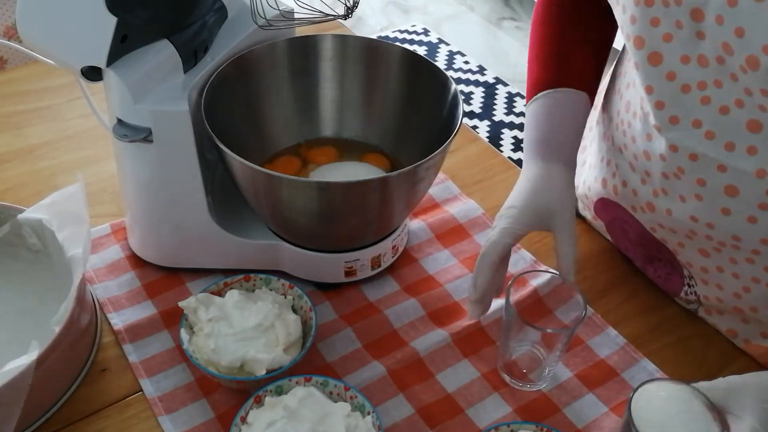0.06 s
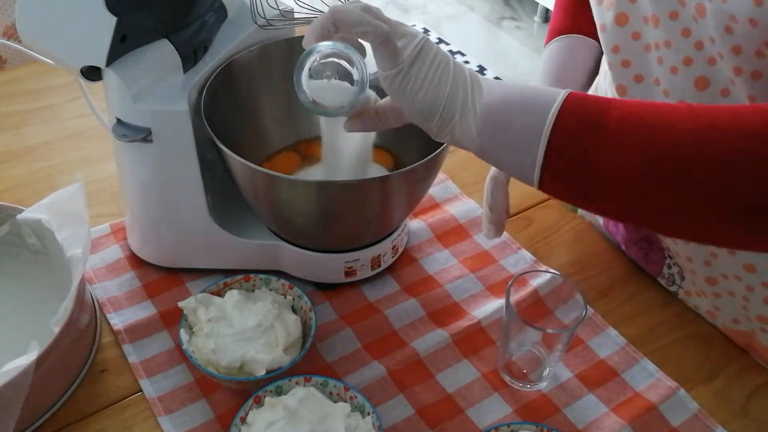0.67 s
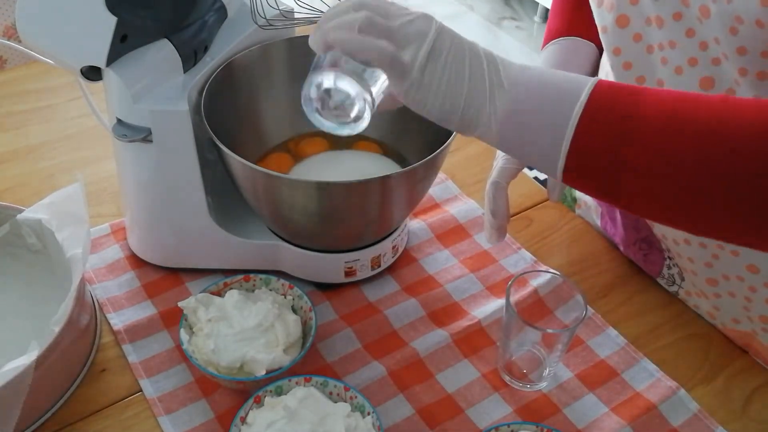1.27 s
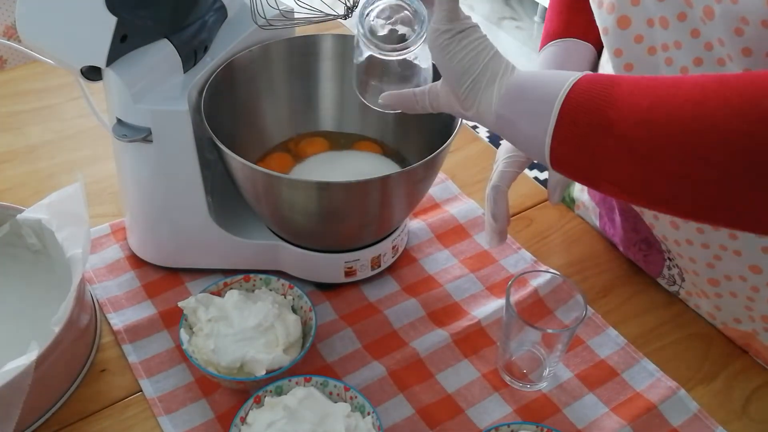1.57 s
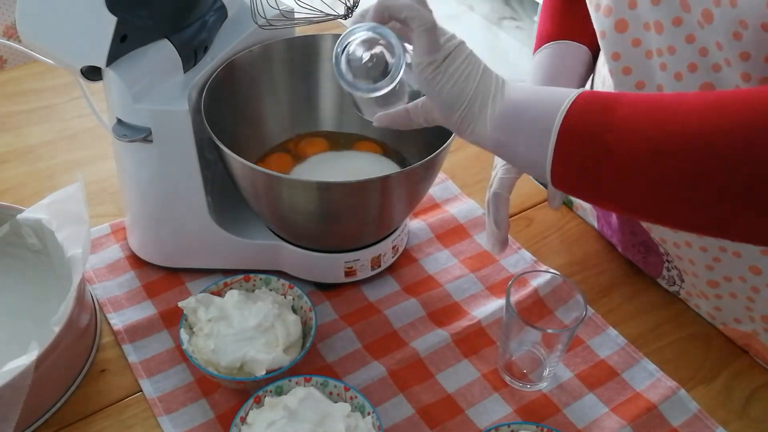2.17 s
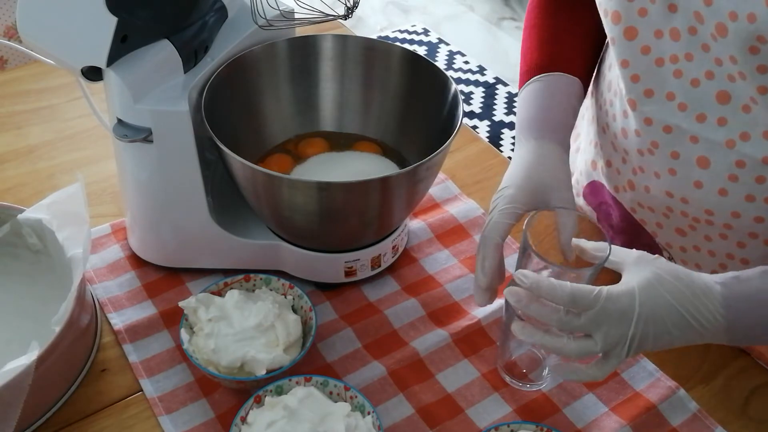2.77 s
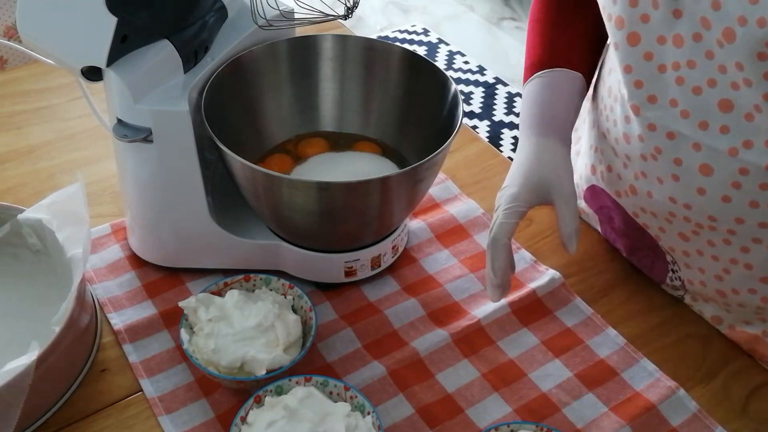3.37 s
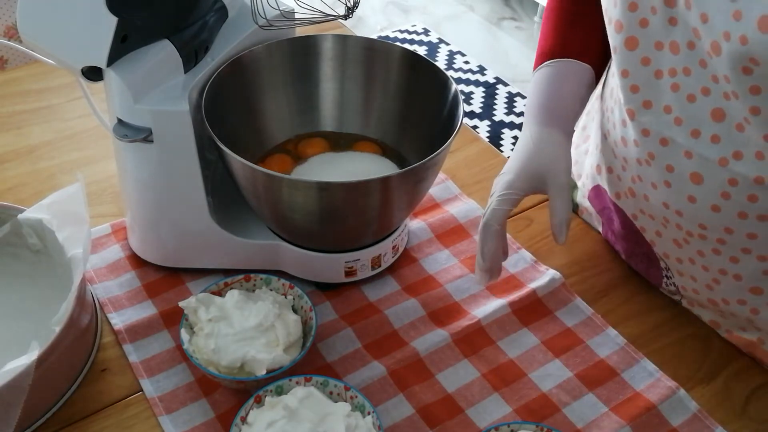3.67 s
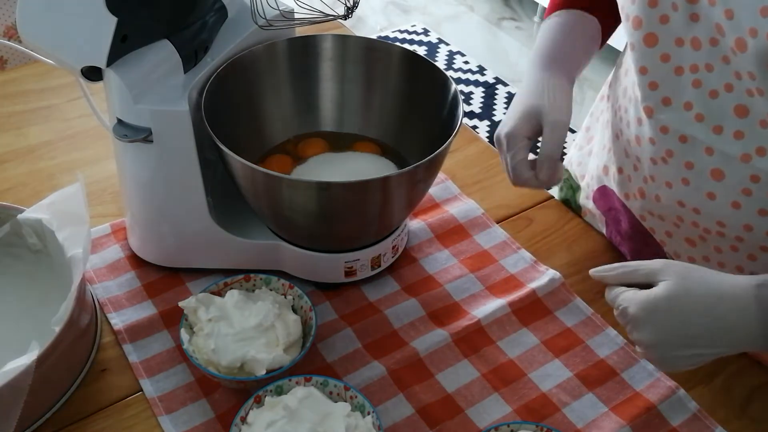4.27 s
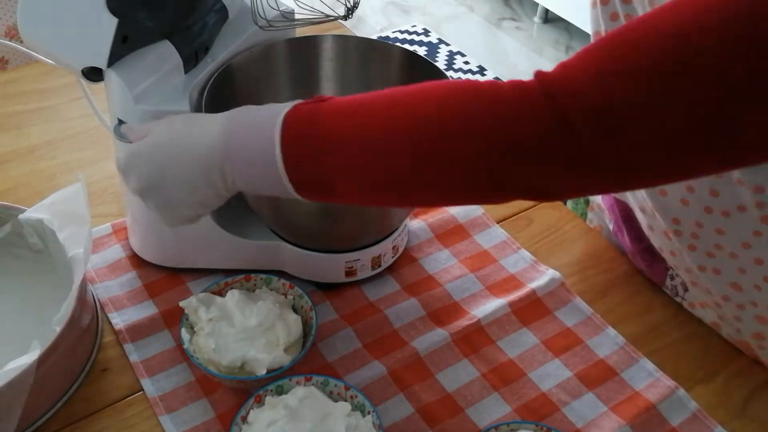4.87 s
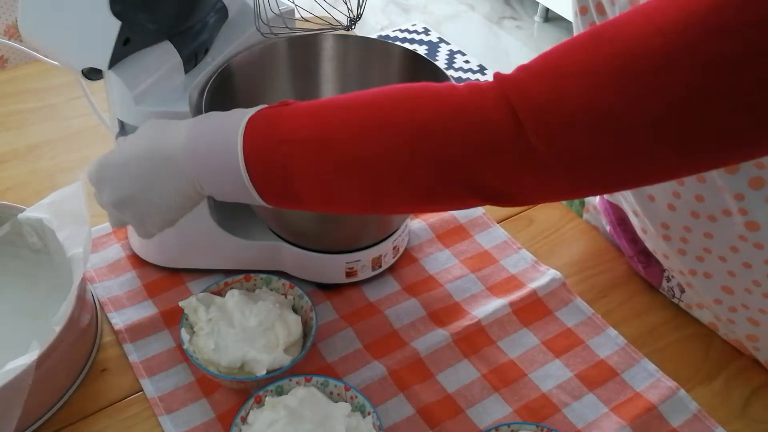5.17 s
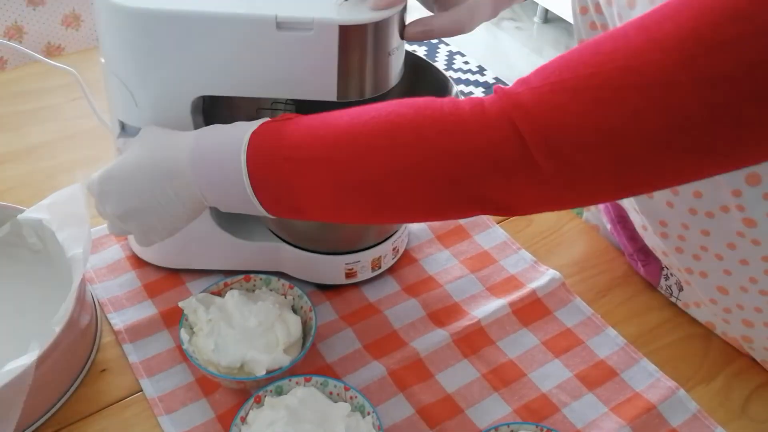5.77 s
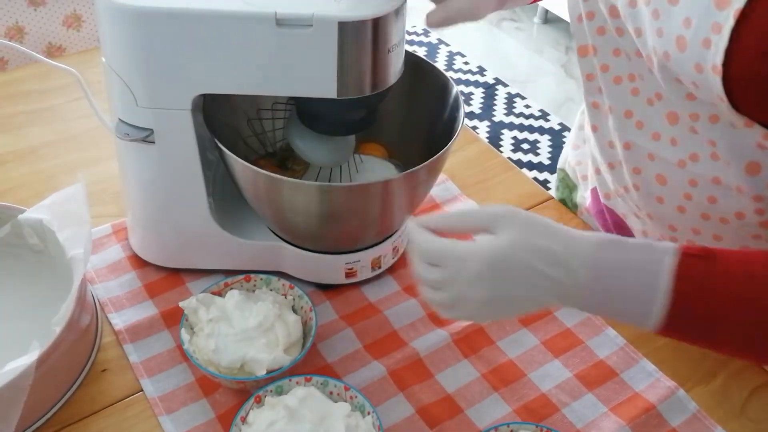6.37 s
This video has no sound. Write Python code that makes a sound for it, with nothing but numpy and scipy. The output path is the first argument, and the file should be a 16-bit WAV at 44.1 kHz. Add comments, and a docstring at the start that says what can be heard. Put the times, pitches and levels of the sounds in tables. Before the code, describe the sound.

A soft, brief pour of sugar into a metal bowl is followed by a quick cluster of clinks as two glasses are stacked, then sharp knocks as they land on a wooden table. After some quiet rustling, a stand mixer's latch clicks and jolts, and the head thuds down, rebounds and locks. A low oven fan hum runs underneath, all heard from nearby with a short kitchen echo.

```python
"""A stand mixer's latch rattles free; its head swings down, thuds home, rebounds and locks.
Before that, sugar hisses into a steel bowl, the empty glass clinks into another one and the pair
is set down hard on a wooden kitchen table. An oven fan hums throughout; gloves and a sleeve rustle.
Blows are decaying sine modes plus dying noise; pouring and rubbing are noise that swells and fades."""
import sys
import numpy as np
from scipy import signal
from scipy.fft import rfft, irfft, next_fast_len
from scipy.io import wavfile

SR = 44100
rng = np.random.default_rng(int(sys.argv[2]) if len(sys.argv) > 2 else 0)


def wav_record(signal):
    """Record a signal, one row per channel, as 16-bit PCM in the file named by sys.argv[1]."""
    frames = np.transpose(np.atleast_2d(signal))
    bounded = np.clip(frames, -1, 1)
    # unit amplitude maps onto the largest positive 16-bit level
    quanta = np.round(bounded * 32767).astype(np.int16)
    wavfile.write(sys.argv[1], SR, quanta)


N = 292177
RING_TIME_S = np.arange(int(.6 * SR)) / SR
BLOW_SAMPLES = .03 * SR


def from_db(db):
    """Decibels to gain."""
    return 10 ** (np.asarray(db) / 20)


def rms_one(x):
    """Scale to rms 1."""
    return x / np.sqrt(np.mean(x ** 2) + 1e-20)


def unit_blow(x):
    """Scale to the energy of 30 ms at rms 1."""
    return rms_one(x) * np.sqrt(BLOW_SAMPLES / x.shape[-1])


def at_hz(points, hz):
    """Read a table on a log-frequency axis."""
    f, value = np.transpose(points)
    return np.interp(np.log(np.maximum(hz, 1)), np.log(f), value)


def drift(rate_hz):
    """Smooth random curve, rms 1."""
    knots = np.arange(N) / SR * rate_hz
    return rms_one(np.interp(knots, np.arange(4096), rng.standard_normal(4096)))


def add(track, s, sound):
    """Mix a sound in at s seconds."""
    start = max(round(s * SR), 0)
    track[:, start:start + sound.shape[-1]] += sound[:, :N - start]


def strokes(rows, rise_db_per_s, fall_db_per_s):
    """Gain of movements that swell, hold and fade."""
    t = np.arange(N) / SR
    levels_db = [db - rise_db_per_s * np.maximum(s - t, 0) - fall_db_per_s * np.maximum(t - s - hold_s, 0)
                 for s, hold_s, db in rows]
    return from_db(np.max(levels_db, axis=0))


# microphone pair: f/Hz, left-right correlation
CORRELATION = [(60, 0.8), (250, 0.9), (600, 0.9), (1200, 0.35), (2500, 0.018), (12000, 0)]

def stereo_pair(mid, side, hz):
    """Left and right: alike in the bass, unrelated in the treble."""
    alike = at_hz(CORRELATION, hz)
    return np.sqrt(1 + alike) * mid + np.sqrt(1 - alike) * side * [[1], [-1]]


def stereo_noise(spectrum, size):
    """Steady coloured noise, rms 1."""
    hz = np.fft.rfftfreq(size, 1 / SR)
    mid, side = np.exp(2j * np.pi * rng.random((2, len(hz))))
    return rms_one(irfft(stereo_pair(mid, side, hz) * from_db(at_hz(spectrum, hz)), size))


def dying_noise(spectrum, t60s):
    """Crowd of short-lived modes: half-octave noise bands decaying by t60s (f/Hz, t60/s)."""
    out, edges_hz = 0, 31.25 * 2 ** np.arange(0, 9.3, .5)
    for low, high in zip(edges_hz, edges_hz[1:]):
        hz = np.sqrt(low * high)
        decay = from_db(-60 * RING_TIME_S / at_hz(t60s, hz))
        burst = rng.standard_normal((2, len(decay))) * decay
        band = signal.butter(2, [low, high], "band", fs=SR, output="sos")
        mid, side = map(rms_one, signal.sosfilt(band, burst))
        out += stereo_pair(mid, side, hz) * from_db(at_hz(spectrum, hz)) * np.sqrt(high - low)
    return unit_blow(out)


def ring(modes, detune=0, scatter_db=.8):
    """Sines swell for one cycle and decay; each blow and microphone catches them differently."""
    out = 0
    for k, (hz, db, t60_s) in enumerate(modes):
        mic_phase = np.pi * rng.normal(0, .56, (2, 1)) * (1 - at_hz(CORRELATION, hz))
        phase = 2 * np.pi * hz * (1 + detune * rng.normal()) * RING_TIME_S + mic_phase
        attack = np.minimum(hz * RING_TIME_S, 1)
        decay = from_db(db + scatter_db * rng.normal() - 60 * RING_TIME_S / t60_s)
        out += (-1) ** k * attack * decay * np.sin(phase)
    return unit_blow(out)


def soften(blow, contact_hz):
    """A softer contact lasts longer and leaves the high modes quiet."""
    return unit_blow(signal.sosfilt(signal.butter(2, contact_hz, fs=SR, output="sos"), blow))


# room decay: f/Hz, t60/s
KITCHEN_DECAY = [(100, .22), (500, .24), (2000, .27), (6000, .23), (15000, .19)]

def in_kitchen(x, wet_db, delay_s):
    """Direct sound plus the diffuse tail from the walls."""
    tail = dying_noise([(30, 0), (16000, 0)], KITCHEN_DECAY) / np.sqrt(BLOW_SAMPLES)
    out = x.copy()
    add(out, delay_s, from_db(wet_db) * signal.fftconvolve(x, tail, axes=1))
    return out


# fan and motor lines: f/Hz, level/dB
HUM_LINES = [(204.7, -54), (371.4, -68), (409.3, -61.5), (821, -64), (1179, -65)]
# air noise: f/Hz, density/dB
AIR_SPECTRUM = [(25, 0), (55, -4), (90, 0.5), (150, -4.5), (350, 0), (480, -9), (850, -6), (1400, -10.5),
                (2000, -9), (2900, -21.5), (5500, -25.5), (9000, -30), (16000, -32.5)]

def oven_fan(air_db=-50.5, waver_db=1.5, wander_hz=.89, right_lag_samples=7):
    """Air noise and wavering hum lines, reaching the left microphone first; higher lines wander more."""
    out = from_db(air_db) * stereo_noise(AIR_SPECTRUM, N)
    for hz, db in HUM_LINES:
        pitch_hz = hz + wander_hz * hz / HUM_LINES[0][0] * drift(12)
        gain = np.sqrt(2) * from_db(db + waver_db * drift(8.6))
        out += gain * np.sin(2 * np.pi * np.cumsum(pitch_hz) / SR)
    return np.array([out[0], np.roll(out[1], right_lag_samples)])


# surges, then the last grains shaken loose: t/s, hold/s, level/dB
POURS = [(.63, 0.063, -57), (.69, 0.082, -59), (.845, 0.029, -56.5), (1.703, .003, -70),
         (1.815, 0.014, -67)]
# grains, also glove ticks: f/Hz, density/dB
GRAIN_SPECTRUM = [(500, -1), (5500, -1), (10700, 1), (15500, 2)]
# steel bowl: f/Hz, level/dB, t60/s
BOWL_MODES = [(5480, -10, .03), (9450, -5, .025), (11800, 2, .008), (13200, 2, .007)]

def sugar(grains_per_s=1500, size_spread_db=3, patter_db=-2, bowl_db=-5):
    """Grains hiss out of the glass and patter on the steel, which rings faintly."""
    sizes = from_db(size_spread_db * np.minimum(rng.exponential(1, N), 5))
    grains = sizes * rng.choice([-1, 1], (2, N)) * (rng.random(N) < grains_per_s / SR)
    bowl = rms_one(signal.fftconvolve(grains, ring(BOWL_MODES), axes=1)[:, :N])
    tick = dying_noise(GRAIN_SPECTRUM, [(1000, .0054)])
    patter = rms_one(signal.fftconvolve(grains, tick, axes=1)[:, :N])
    hiss = stereo_noise(GRAIN_SPECTRUM, N)
    stream = rms_one(hiss + from_db(patter_db) * patter + from_db(bowl_db) * bowl)
    return strokes(POURS, rise_db_per_s=220, fall_db_per_s=150) * stream


# sleeve, latch and hinge rubbing: t/s, hold/s, level/dB
RUBS = [(4.06, 0.12, -59), (4.6, 0.41, -60), (5.08, 0.035, -44), (5.48, 0.16, -48.5), (5.81, 0.026, -45),
        (5.97, 0.0075, -42.5), (6.28, 0.21, -58.5)]
# mixer casing, rubbed or struck: f/Hz, density/dB
CASING_SPECTRUM = [(150, -13.5), (350, -11), (600, -0.5), (1000, 2), (1800, 0), (3000, -4.5), (5000, -7),
                   (7000, -13.5), (10000, -14), (15000, -19.5)]
# gloves on glass and casing: t/s, level/dB
GLOVE_TICKS = [(2.514, -67), (4.058, -65), (4.092, -65), (5.647, -57)]

def handling(friction_db=1.5, hollow_hz=730, width_hz=140, hollow_db=-6):
    """Uneven rubbing sets the hollow casing singing; gloves tick."""
    friction = rms_one(from_db(friction_db * drift(150)))
    hiss = stereo_noise(CASING_SPECTRUM, N) * friction
    hollow = rms_one(signal.lfilter(*signal.iirpeak(hollow_hz, hollow_hz / width_hz, fs=SR), hiss))
    rubs = strokes(RUBS, rise_db_per_s=182, fall_db_per_s=172) * (hiss + from_db(hollow_db) * hollow)
    ticks = np.zeros((2, N))
    for s, db in GLOVE_TICKS:
        add(ticks, s, from_db(db) * dying_noise(GRAIN_SPECTRUM, [(1000, .018)]))
    return rubs + in_kitchen(ticks, wet_db=-4, delay_s=.0086)


# glass on glass: t/s, level/dB, contact cutoff/Hz, crack re ring/dB
CLINKS = [(2.833, -28.5, 14600, 1.5), (2.8402, -26, 14500, -9), (2.845, -33.5, 12000, 4),
          (2.8505, -27, 15300, -9), (2.8603, -31, 14800, -6), (2.9866, -36, 7960, 8),
          (3.0147, -41.5, 10900, 8)]
# glass ring: f/Hz, level/dB, t60/s
GLASS_MODES = [(721, -22, .15), (1850, -23, .12), (5622, -8, .09), (5700, 0, .165), (12860, -16, .1),
               (13150, -7, .12), (13285, -4, .13), (15640, -16, .09)]
# contact crack: f/Hz, density/dB
CRACK_SPECTRUM = [(300, -16), (750, -16), (1900, -16.5), (3000, -16.5), (4900, -7), (5700, 15), (6300, 2.5),
                  (8000, -2), (10800, -15.5), (12500, -3.5), (16000, -13)]

def glasses(crack_t60_s=.022, grip_detune=.002, left_db=2.5):
    """One glass chatters into the other, beaming left; the walls ring high, the trapped air low."""
    out = np.zeros((2, N))
    decay = from_db(-60 * RING_TIME_S / crack_t60_s)
    for s, db, contact_hz, crack_db in CLINKS:
        crack = unit_blow(stereo_noise(CRACK_SPECTRUM, len(decay)) * decay)
        clink = ring(GLASS_MODES, grip_detune) + from_db(crack_db) * crack
        add(out, s, from_db(db) * soften(clink, contact_hz))
    return in_kitchen(out * from_db([[left_db], [-left_db]]), wet_db=-5.5, delay_s=.0086)


# blows on the table: t/s, level/dB, contact cutoff/Hz, pock/dB, boom/dB, free ring re blow/dB
KNOCKS = [(0.001, -41.5, 790, -51, -39, -11), (2.859, -44, 800, -42.5, -46, -15),
          (3.0153, -41.5, 600, -54, -30.5, -4.5), (3.6807, -17, 7040, -23, -41.5, 1),
          (3.779, -27.5, 700, -41.5, -58, -13), (3.7855, -23.5, 1370, -18, -35.5, 1.5)]
# struck wood: f/Hz, density/dB
WOOD_SPECTRUM = [(60, -46), (150, -31), (300, -16), (450, -32), (600, -8), (760, -2), (1050, -9.5),
                 (1450, -13.5), (2150, -6), (3300, -20), (6200, -26), (11000, -65)]
# free ring, pock, low boom of the room: f/Hz, level/dB, t60/s
KNOCK_MODES = [(549, -3.5, .22), (634, -8, .2), (965, -8, .15), (1186, -7, .18), (1337, 5.5, .16),
               (1525, -4, .19), (1955, -10, .18), (2110, -7, .17), (2362, -9, .19), (2794, -14, .17)]
POCK_MODES = [(693, 0, .07), (810, 0, .07)]
LOW_BOOM_MODES = [(144, 3.5, 0.19), (206, 5, 0.064), (280, 2.5, 0.2), (729, 4.5, 0.13)]

def table_knocks():
    """Thick glass bases hit the wood with a throbbing pock; each knock sets off a low boom in the room."""
    knocks, rings = np.zeros((2, 2, N))
    for s, db, contact_hz, pock_db, boom_db, ring_db in KNOCKS:
        wood = dying_noise(WOOD_SPECTRUM, [(300, .13), (1500, .076), (8000, .023)])
        add(knocks, s, from_db(db) * signal.lfilter(*signal.butter(1, contact_hz, fs=SR), wood))
        free_ring = from_db(db + ring_db) * soften(ring(KNOCK_MODES), contact_hz)
        pock = from_db(pock_db) * ring(POCK_MODES)
        boom = from_db(boom_db) * ring(LOW_BOOM_MODES)
        add(rings, s, free_ring + pock + boom)
    return rings + in_kitchen(knocks, wet_db=-4.5, delay_s=.0095)


# latch catches and slips, plus the head's second, bright click at 5.8385 s: t/s, click/dB, contact cutoff/Hz,
# thump/dB
LATCH_CLICKS = [(5.0075, -45, 14000, -71), (5.048, -35, 12100, -75), (5.0528, -28.5, 15100, -63),
                (5.101, -42, 4700, -47), (5.1151, -33, 14000, -47), (5.1195, -35.5, 620, -44),
                (5.152, -36, 12000, -48), (5.303, -33.5, 3440, -52), (5.7609, -35, 8800, -39.5),
                (5.787, -39.5, 4000, -42), (5.8385, -24.5, 15000, -39), (5.9461, -35.5, 3500, -65),
                (5.9595, -40.5, 7150, -58), (5.9797, -30, 15000, -50)]
# head jolts free, slams home: t/s, click/dB, contact cutoff/Hz, thump/dB, first rebound re blow/dB
HEAD_SLAMS = [(5.214, -25.5, 5100, -31.5, -5.5), (5.8353, -19, 2880, -14, -19)]
# fingers on the casing: t/s, level/dB
FINGER_TAPS = [(5.443, -51), (6.176, -51), (6.223, -54), (6.256, -48.5), (6.298, -48)]

def mixer_contacts(graze_lead_s=.0102, graze_db=-15, glancing_hz=4050, finger_hz=2700,
                   rebound_s=.0155, slowing=1.49, click_loss_db=.5, thump_loss_db=4.5):
    """Latch, head and finger contacts; the head grazes its stop, slams and rebounds ever more slowly."""
    contacts = list(LATCH_CLICKS)
    for s, click_db, contact_hz, thump_db, rebound_db in HEAD_SLAMS:
        contacts.append((s - graze_lead_s, click_db + graze_db, glancing_hz, -np.inf))
        contacts.append((s, click_db, contact_hz, thump_db))
        for k in range(3):
            contacts.append((s + rebound_s * (k + 1) ** slowing,
                             click_db + rebound_db - k * click_loss_db, glancing_hz,
                             thump_db + rebound_db - k * thump_loss_db))
    return contacts + [(s, db, finger_hz, db - 1) for s, db in FINGER_TAPS]


# hinge bumps as the head comes free and starts to move: t/s, level/dB
HINGE_BUMPS = [(5.216, -32.5), (5.2306, -33.5), (5.441, -37.5), (5.456, -39)]
# casing, clunk on the stop, pawl: f/Hz, level/dB, t60/s
CASING_MODES = [(570, -14, 0.16), (674, 15, 0.041), (815, -14, 0.086), (1418, 11, 0.13), (2010, -4, 0.12)]
CLUNK_MODES = [(533, 0, 0.032)]
PAWL_MODES = [(1720, -2, .045), (2080, 0, .035)]
# low boom of the room and ring after each mixer blow: f/Hz, level/dB, t60/s
THUMP_MODES = [(143.3, 2, 0.23), (265, 5.5, 0.098), (413, -1.5, 0.17), (557, 1.5, 0.22), (621, 3, 0.08),
               (917, -14, .12), (1070, -9, 0.23), (1350, -7, 0.2), (1530, -7, 0.2), (1965, -13, 0.15)]
BUMP_MODES = [(279.4, -14.5, 0.24), (332, -11.5, 0.023)]
# thump, locking spring: f/Hz, density/dB
THUMP_SPECTRUM = [(35, -23), (70, -10.5), (140, -7), (300, -12.5), (460, -4.5), (720, -24), (1100, -18),
                  (1500, -12.5), (2300, -22), (5000, -41.5)]
SPRING_SPECTRUM = [(2500, -7), (4700, 3), (6700, 6.5), (9500, -21), (14000, 7)]

def mixer(hollow_db=-11, crowd_db=-6, modes_db=-4.5, clunk_db=-4, thump_lag_s=.003,
          pawl_s=5.0083, pawl_db=-40.5, lock_s=5.9805, spring_db=-35):
    """Contacts clack in the casing, clunk on the stop and set the room booming; a spring snaps shut."""
    clicks, thumps, clunks = np.zeros((3, 2, N))
    for s, click_db, contact_hz, thump_db in mixer_contacts():
        click = dying_noise(CASING_SPECTRUM, [(500, .053), (2500, .055), (10000, .017)])
        click += from_db(hollow_db) * ring(CASING_MODES, detune=.0263)
        add(clicks, s, from_db(click_db) * soften(click, contact_hz))
        crowd = dying_noise(THUMP_SPECTRUM, [(80, .076), (500, .029), (2000, .3)])
        thump = from_db(crowd_db) * crowd + from_db(modes_db) * ring(THUMP_MODES)
        add(thumps, s + thump_lag_s, from_db(thump_db) * thump)
        add(clunks, s, from_db(thump_db + clunk_db) * ring(CLUNK_MODES))
    add(clicks, pawl_s, from_db(pawl_db) * ring(PAWL_MODES))
    for s, db in HINGE_BUMPS:
        add(thumps, s, from_db(db) * ring(BUMP_MODES))
    add(clicks, lock_s, from_db(spring_db) * dying_noise(SPRING_SPECTRUM, [(7000, .021)]))
    clicks = in_kitchen(clicks, wet_db=-4, delay_s=.007)
    thumps = in_kitchen(thumps, wet_db=-12, delay_s=.0073)
    return clunks + clicks + thumps


def scene():
    """Stereo sum of all sources."""
    return oven_fan() + glasses() + table_knocks() + mixer() + sugar() + handling()


# microphone colouring: f/Hz, left minus right/dB
MIC_BALANCE = [(50, 2), (140, 3.5), (210, 7), (450, 5), (900, 6), (1900, 0), (4000, 0), (8000, 1),
               (15000, 1)]

def record(dry, low_cut_hz=42, high_cut_hz=15750):
    """The microphone ports colour each side and lose deep bass; peaks clip and the top is cut."""
    size = next_fast_len(N + SR // 10)
    tilt_db = at_hz(MIC_BALANCE, np.fft.rfftfreq(size, 1 / SR)) / 2
    coloured = irfft(rfft(dry, size) * from_db([tilt_db, -tilt_db]), size)[:, :N]
    low_cut = signal.butter(2, low_cut_hz, "high", fs=SR, output="sos")
    high_cut = signal.ellip(10, .1, 70, high_cut_hz, fs=SR, output="sos")
    clipped = np.clip(signal.sosfilt(low_cut, coloured), -1, 1)
    return signal.sosfilt(high_cut, clipped)


dry = scene()
out = record(dry)
wav_record(out)
```